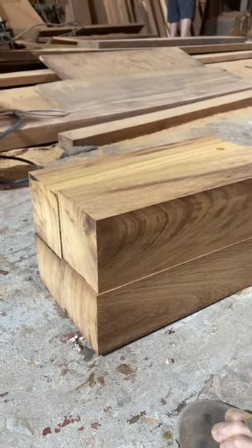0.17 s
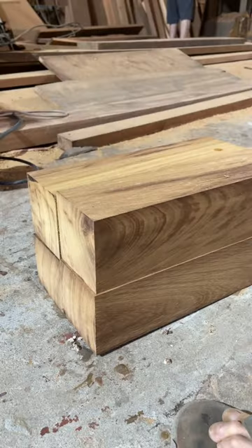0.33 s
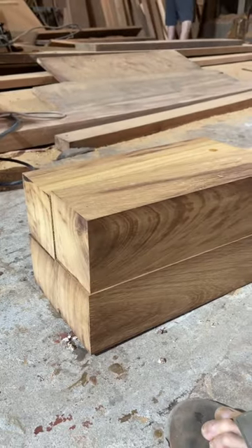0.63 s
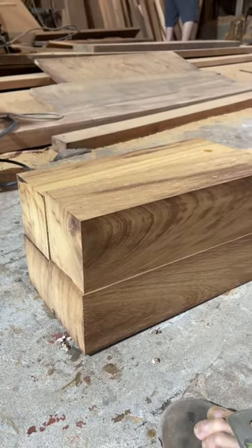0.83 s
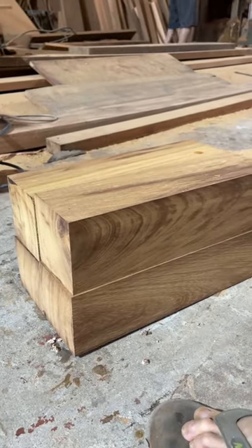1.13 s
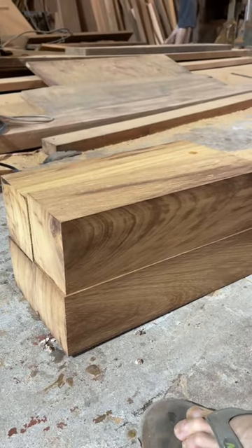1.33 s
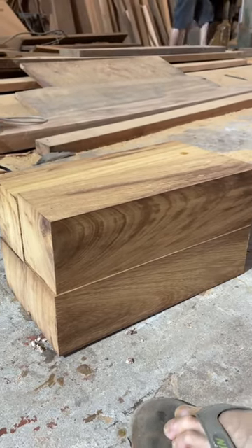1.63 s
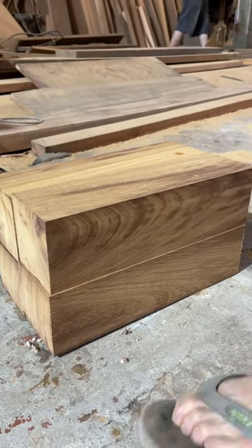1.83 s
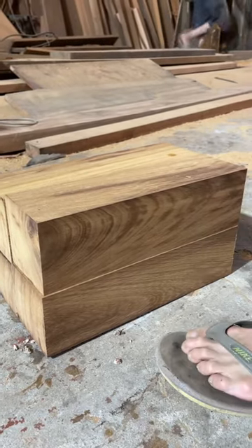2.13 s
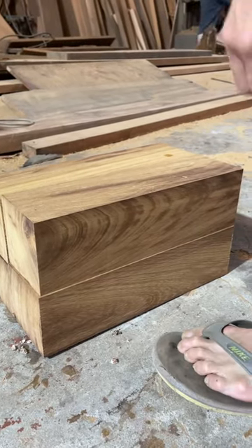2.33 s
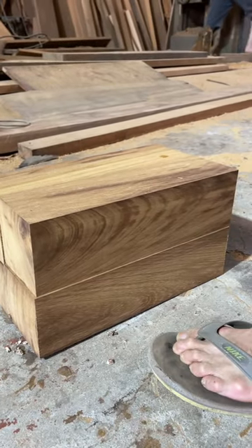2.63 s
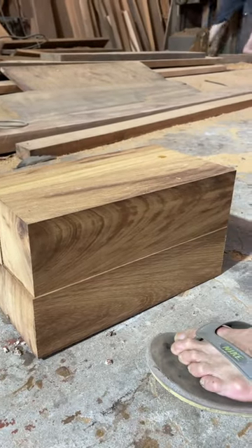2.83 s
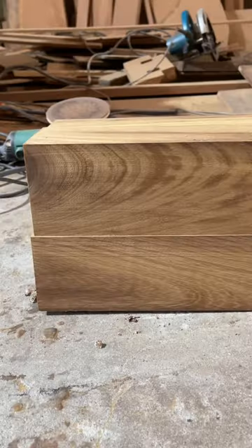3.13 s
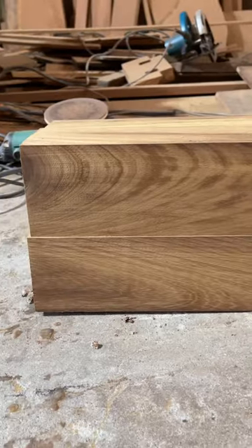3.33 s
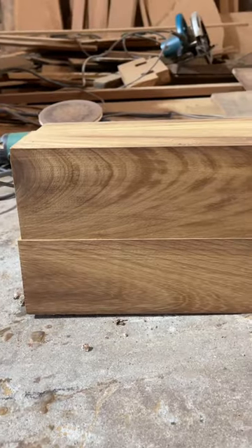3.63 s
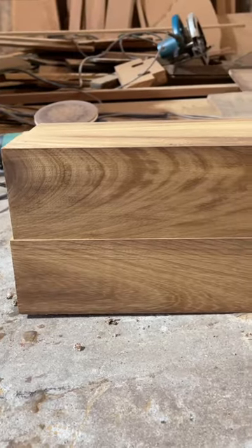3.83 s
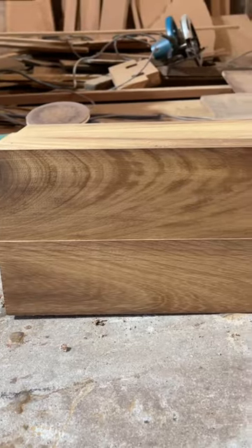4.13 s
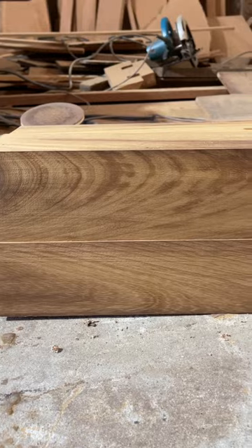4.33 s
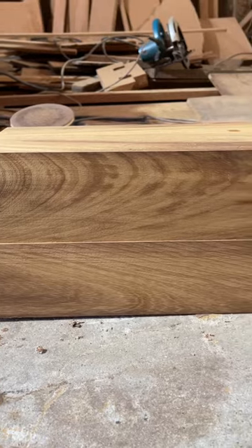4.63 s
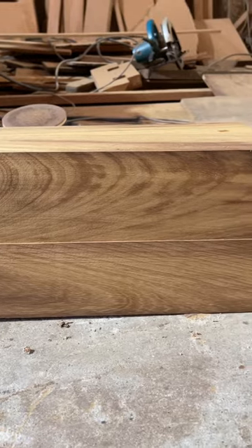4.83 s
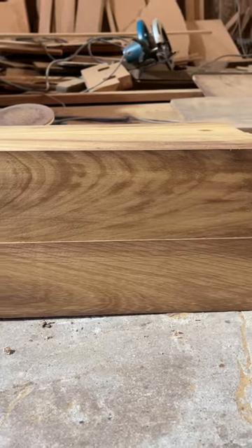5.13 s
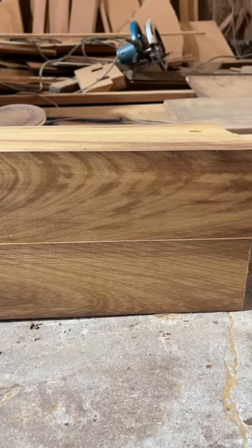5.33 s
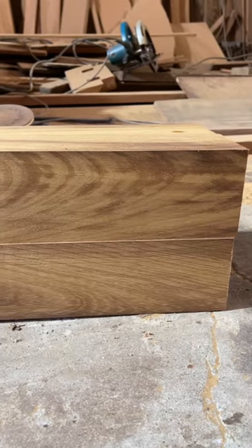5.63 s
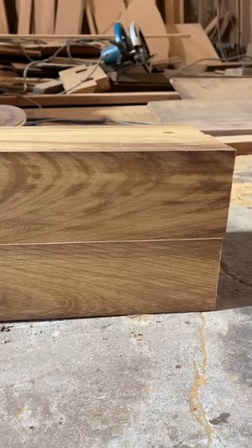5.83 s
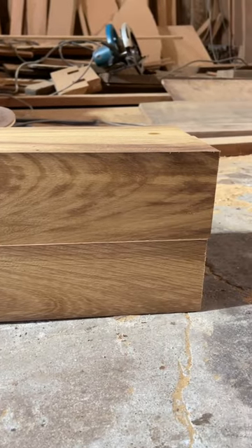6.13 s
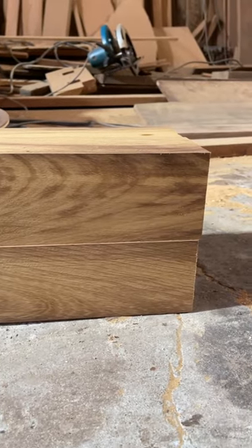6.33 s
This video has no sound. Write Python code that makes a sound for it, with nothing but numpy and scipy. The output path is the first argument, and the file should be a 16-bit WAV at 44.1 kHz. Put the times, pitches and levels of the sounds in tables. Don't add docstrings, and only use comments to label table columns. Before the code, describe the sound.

From 0 to 2.8 s a planer a few metres off cuts a board in an open workshop: a rough, pitched roar with a fast knife buzz, hissing torn chips and board resonances that shift in pitch. It begins strong, eases from about 0.3 to 1 s, swells again just after 1 s, then gradually weakens. Wind thumps the microphone at the start and again around 2.4-2.7 s; small metal knocks fall at 2.4, 2.55 and 2.8 s. A near-silent gap of about 0.05 s marks the scene change. From 2.9 s the machine idles with a wavering low hum near 240 Hz, thin motor and belt whines and airy roar. At 3.3 s a hard metal clank bounces twice and echoes. Gusts continue buffeting, especially 3.6-4.6 s. At about 5.7 s the next board bites with a sudden loud crack, then a bright, harsh roar fluctuates to the abrupt end at 6.5 s.

```python
import sys
import numpy as np
from scipy import signal
from scipy.fft import rfft, irfft, next_fast_len
from scipy.io import wavfile
from scipy.ndimage import uniform_filter1d

SR = 44100
rng = np.random.default_rng(int(sys.argv[2]) if len(sys.argv) > 2 else 0)


def master_out(mix):
    frames = np.transpose(np.atleast_2d(mix))
    ceiling = np.clip(frames, -1, 1)
    pcm = np.round(ceiling * 32767).astype(np.int16)
    wavfile.write(sys.argv[1], SR, pcm)


def ratio_of_db(decibels):
    return 10 ** (np.asarray(decibels, float) / 20)


N = 286076

# time in seconds, cut level in dB, brightness in dB,
# chip hiss against the knife bites in dB.
BOARD_PASSES = [
    [(0.0, -30.5, -7.5, 0.5), (0.26, -37, -7, 6.5), (0.6, -38.5, 3, -5.5), (0.97, -38, -4.5, 4),
     (1.07, -28.5, -4.5, -4.5), (1.66, -33, -4, -1), (1.73, -31.5, -10.5, 7), (2.03, -31.5, -4.5, -6),
     (2.83, -37.5, 0.5, 0.5)],
    [(5.69, -57, 23, -11), (5.742, -16, 0, -24), (5.776, -24.5, 1, -5.5), (5.85, -28.5, 4.5, -7),
     (5.98, -28, 1.5, -7), (6.172, -22.5, -6, -4.5), (6.312, -26.5, -3.5, -1), (6.487, -27, -1.5, -7.5)],
]
KNIFE_LEVELS = [0, -14, -19]
# start in seconds, end in seconds.
SCENE_CHANGE = (2.836, 2.8815)
# time in seconds, buffet level in dB, buffet pitch in Hz, spread of the gust in seconds.
WIND_GUSTS = [(0.014, -15.5, 176, 0.053), (0.079, -11.5, 190, 0.01), (0.179, -16, 232, 0.044),
              (0.343, -20.5, 105, .04), (0.419, -20.5, 143, 0.053), (0.792, -24.5, 132, 0.15),
              (2.42, -20.5, 216, 0.032), (2.515, -15.5, 236, 0.038), (2.652, -13.5, 148, 0.035),
              (2.738, -16, 237, 0.013), (2.945, -22, 340, 0.05), (3.002, -19, 128, 0.15),
              (3.264, -23, 325, 0.034), (3.304, -15.5, 352, 0.016), (3.624, -14.5, 173, 0.027),
              (3.95, -18.5, 151, 0.082), (4.038, -18.5, 230, 0.071), (4.128, -17.5, 175, 0.012),
              (4.383, -13.5, 150, 0.067), (4.435, -13, 223, 0.032), (4.51, -16.5, 177, 0.034),
              (4.595, -22, 308, 0.046), (4.948, -19.5, 310, 0.023), (5.015, -17, 149, 0.016),
              (5.429, -18, 200, 0.053), (5.653, -13.5, 155, 0.036), (5.727, -15.5, 188, 0.015),
              (5.92, -19, 117, 0.072), (6.253, -16.5, 304, 0.048), (6.456, -20, 311, 0.099)]


def evened(x):
    return x / np.sqrt(np.mean(abs(x) ** 2) + 1e-20)


def read(points, hz):
    f, value = np.transpose(points)
    return np.interp(np.log(hz + 1), np.log(f + 1), value)


def column(tables, t, order):
    rows = np.concatenate(tables)
    return np.interp(t, rows[:, 0], rows[:, order])


def add(mix, s, sound):
    part = mix[..., max(round(s * SR), 0):][..., :sound.shape[-1]]
    part += sound[..., :part.shape[-1]]


def coloured(x, points):
    size = next_fast_len(N)
    gain = ratio_of_db(read(points, np.fft.rfftfreq(size, 1 / SR)))
    return evened(irfft(rfft(x, size) * gain, size)[..., :N])


def slow(hz):
    frames = N // 64 + 2
    fall = 1 / (1 + (np.fft.rfftfreq(frames, 64 / SR) / hz) ** 4)
    curves = evened(irfft(rfft(rng.standard_normal((2, frames))) * fall, frames))
    return np.array([np.interp(np.arange(N) / 64, np.arange(frames), c) for c in curves])


def resonate(x, hz, width):
    r = np.exp(-np.pi * width / SR)
    return signal.lfilter([1 - r], [1, -2 * r * np.cos(2 * np.pi * hz / SR), r * r], x)


def spectrum(x):
    return signal.stft(x, SR, nperseg=2048, noverlap=1536)


def waveform(z):
    return signal.istft(z, nperseg=2048, noverlap=1536)[1][..., :N]


def turns():
    # time in seconds, shaft speed in Hz.
    shaft_speed = [(0, 79.6), (2.8, 79.63), (2.9, 79.7), (5.7, 79.7), (5.85, 79.62), (6.1, 79.51),
                   (6.49, 79.4)]
    s, hz = np.transpose(shaft_speed)
    return np.cumsum(np.interp(np.arange(N) / SR, s, hz)) / SR


def knife_bites(wobble=.07):
    passes = len(KNIFE_LEVELS) * turns()
    hit = np.flatnonzero(np.diff(passes // 1) > 0)
    knife = (passes[hit + 1] % len(KNIFE_LEVELS)).astype(int)
    bites = np.zeros(N)
    bites[hit] = ratio_of_db(KNIFE_LEVELS)[knife] * (1 + wobble * rng.standard_normal(len(hit)))
    return bites


def board_resonances(hz, when, width=40, ring_db=-2, skirt=0.5, skirt_width=300):
    # start in seconds, end in seconds, pitch in Hz, gain in dB.
    board_modes = [(0.0, 0.338, 7440, 17), (0.076, 0.56, 2890, 6.5), (0.97, 1.248, 2390, 8),
                   (0.99, 1.658, 2452, 14), (6.198, 6.5, 4370, 4), (0.72, 1.7, 4220, 6),
                   (1.05, 1.922, 1433, 9.5), (1.36, 1.74, 2950, 9), (1.587, 2.62, 1743, 7),
                   (1.89, 2.476, 1474, 9.5), (1.8, 2.5, 2654, 12), (2.124, 2.56, 2810, 9),
                   (2.0, 2.712, 2483, 10), (2.563, 2.8, 7430, 15), (5.696, 6.16, 3627, 13),
                   (5.72, 5.9, 3035, 26.5), (5.723, 5.86, 1650, 15), (5.95, 6.32, 2832, 13),
                   (5.954, 6.5, 987, 11), (6.002, 6.322, 5803, 8), (6.015, 6.3, 1880, -2),
                   (6.137, 6.483, 6530, 19.5), (6.26, 6.513, 3050, 16), (6.309, 6.5, 2400, 5.5),
                   (6.33, 6.502, 3826, 21), (5.8, 6.106, 1370, 11.5), (0.0, 0.395, 2556, 8.5),
                   (2.62, 2.78, 1390, 24.5), (2.674, 2.9, 2250, 15), (2.508, 2.818, 3770, 2)]
    rings = skirts = 0
    for (start, end, mode_hz, db), lag in zip(board_modes, rng.random(len(board_modes))):
        on = np.clip(np.minimum((when - start) / .05, (end - when) / .3 + .4), 0, 1)
        peak = ratio_of_db(db + ring_db - skirt * db) / (1 + 1j * (hz - mode_hz) / width) ** 2
        rings = rings + np.outer(peak, on * np.exp(2j * np.pi * lag))
        skirts = skirts + np.outer(skirt * db / (1 + ((hz - mode_hz) / skirt_width) ** 2) ** 2, on)
    return rings, skirts


def cutting(direct=0.26, treble_direct=0.27, gate=0.35, patchy_db=4.0):
    # frequency in Hz, level in dB.
    bite_colour = [(300, -11), (600, 0.5), (1000, -1.5), (1500, 0.5), (2300, 6), (3000, 3), (4000, 3.5),
                   (5000, 7), (6500, -1.5), (8000, 2), (9500, -5), (11000, -14), (12500, -11), (14000, -55)]
    # frequency in Hz, level in dB.
    chip_colour = [(300, 8), (600, -28), (1000, -27), (1500, 0), (2300, 5), (3000, 2.5), (4000, 6.5),
                   (5000, 7.5), (6500, 7), (8000, 4), (9500, 16), (11000, 8.5), (12500, -21), (14000, -53)]
    t, bites = np.arange(N) / SR, knife_bites()
    hz, when, z = spectrum(bites)
    a, b = rng.standard_normal((2, len(when), 2, len(hz))).transpose(0, 2, 3, 1)

    scatter = uniform_filter1d(uniform_filter1d(a + 1j * b, size=24, axis=2), size=24, axis=2)
    straight = direct + (treble_direct / (1 + (5000 / (hz + 1)) ** 6))[:, None]
    paths = straight + evened(scatter)
    rings, skirts = board_resonances(hz, when)
    octaves = np.clip(np.log2(hz / 3000 + 1e-9), 0, 1)
    bright = np.outer(octaves, column(BOARD_PASSES, when, order=2) + 4) + skirts
    tone = waveform(z * (paths + rings) * ratio_of_db(read(bite_colour, hz)[:, None] + bright))

    beat = 1 - gate + gate * evened(signal.lfilter([1], [1, -.99], bites))
    hiss = coloured(rng.standard_normal((2, N)) * beat, chip_colour)
    patches = evened(uniform_filter1d(uniform_filter1d(a[0], size=20, axis=0), size=6, axis=1))
    hiss = waveform(spectrum(hiss)[2] * ratio_of_db(bright + patchy_db * patches))

    tone /= np.sqrt(uniform_filter1d((tone ** 2).mean(0), size=6000))
    feeding = (t < SCENE_CHANGE[0]) | (t > BOARD_PASSES[1][0][0])
    level = ratio_of_db(column(BOARD_PASSES, t, order=1) + 3.0)
    return feeding * level * (tone + ratio_of_db(column(BOARD_PASSES, t, order=3)) * hiss)


def knife_hum(waver_db=1.37, upper_waver_db=3.5):
    # time in seconds, hum level in dB.
    hum_levels = [(0.07, -37.5), (0.48, -36.5), (0.7, -29), (2.0, -28), (2.66, -27), (2.86, -33),
                  (3.01, -27.5), (3.22, -36), (3.33, -29), (4.07, -23), (4.43, -27), (4.51, -32.5),
                  (4.7, -25), (5.67, -24), (5.81, -31.5), (5.96, -25), (6.4, -27.5), (6.49, -40)]
    # multiple of the knife rate, level in dB.
    hum_orders = [(1, 0), (2, -16), (3, -19), (4, -23), (5, -37), (6, -58), (7, -32), (8, -28.5)]
    angle = 2 * np.pi * len(KNIFE_LEVELS) * turns()
    level_db = column([hum_levels], np.arange(N) / SR, order=1)
    gusty = np.clip(20 * np.log10(gusting()[0]) / 6 + 7, .5, 3)
    gain = np.sqrt(2) * ratio_of_db(level_db - 3.5 + waver_db * gusty * slow(38)[0])
    hum = gain * np.sin(angle + 0.13 * slow(12)[0])
    for k, db in hum_orders[1:]:
        hum = hum + ratio_of_db(db - 28 + upper_waver_db * slow(18.0)) * np.sin(k * angle + 0.41 * slow(9.6))
    return hum


def motor_and_air(belt_hz=1001, steady_hz=2887, steady_db=-54, roar_db=-38):
    # frequency in Hz, level in dB.
    roar_colour = [(60, -18), (300, -6), (600, -17), (800, -4), (1050, -13), (1300, -14), (2000, -18),
                   (3500, -21.5), (5000, -24.5), (7000, -26.5), (8500, -19.5), (10000, -20), (11500, -34),
                   (12200, -72)]
    # pitch in Hz, bandwidth in Hz, level in dB.
    fuzzy_whines = [(778, 1.6, -49.5), (895, 2.6, -51), (712, 16, -51.5), (730, 5, -49), (1225, 18, -54),
                    (2954, 10, -55)]
    # time in seconds, level in dB.
    belt_levels = [(0, -97), (2.9, -46), (3.9, -49.5), (4.2, -42), (5.3, -43.5), (5.6, -42)]
    t, air = np.arange(N) / SR, rng.standard_normal((2, N))
    whines = sum(ratio_of_db(db) * evened(resonate(air, hz, width)) for hz, width, db in fuzzy_whines)
    belt_gain = ratio_of_db(column([belt_levels], t, order=1) + 1.0 * slow(3.3)[0])
    whines += belt_gain * np.sin(2 * np.pi * belt_hz * t + .5 * slow(4.3))
    whines += ratio_of_db(steady_db + 1.5 * slow(8)) * np.sin(2 * np.pi * steady_hz * t + 1.3 * slow(9))
    return whines + ratio_of_db(roar_db + 0.46 * slow(3.5)[0]) * coloured(air, roar_colour)


def gusting(rumble_db=-14.5, reach_db=-0.5, reach_db_per_octave=12, calm_reach_db=-13.5):
    # time in seconds, rumble level in dB.
    breeze_levels = [(0.3, -40), (1.1, -43), (2.3, -37), (3.4, -34.5), (3.75, -41.5), (4.3, -37),
                     (5.3, -36), (5.85, -36.5), (6.49, -41)]
    t = np.arange(0, N + 64, 64) / SR
    low = ratio_of_db(column([breeze_levels], t, order=1)) ** 2
    mids = low * ratio_of_db(calm_reach_db) ** 2
    for s, db, hz, spread in WIND_GUSTS:
        swell = ratio_of_db(db + rumble_db) ** 2 * np.exp(-((t - s) / max(spread, .01)) ** 2)
        low = low + swell
        mids = mids + swell * ratio_of_db(reach_db + reach_db_per_octave * np.log2(hz / 200)) ** 2
    return [np.interp(np.arange(N) / SR, t, np.sqrt(power)) for power in (low, mids)]


def wind(lumpy_db=2.5, cycles=2.2):
    # frequency in Hz, level in dB.
    rumble_colour = [(20, -60), (34, -22), (55, 0), (110, 0), (200, -8), (350, -13), (600, -24),
                     (1000, -48), (3000, -80)]
    low, mids = coloured(rng.standard_normal((2, 2, N)), rumble_colour)
    band = signal.butter(2, [220, 620], "bandpass", fs=SR, output="sos")
    mids = evened(signal.sosfilt(band, mids))
    low_gain, mid_gain = gusting()
    out = ratio_of_db(lumpy_db * slow(33)[0]) * (low_gain * low + mid_gain * mids)
    for (s, db, hz, _), (phase, bend) in zip(WIND_GUSTS, rng.random((len(WIND_GUSTS), 2))):
        u = np.arange(-cycles, cycles, hz / SR)
        swing = np.cos(2 * np.pi * (phase + u + 1.35 * (bend - .5) * u ** 2))
        puff = np.exp(-4 * (u / cycles) ** 2) * swing
        add(out, s - cycles / hz, ratio_of_db(db - 3.5) * puff)
    return out


def clanks(rattle=1.1, room_db=-4, room_t60=0.56):
    # time in seconds, peak level in dB, own ring in Hz, its 60 dB decay in seconds.
    strikes = [
        (2.404, -18, 1300, 0.1),
        (2.411, -19, 1513, 0.086),
        (2.549, -23, 1100, .05),
        (2.806, -21, 886, 0.085),
        (3.3122, -8, 1357, 0.16),
        (3.3364, -14, 2785, 0.11),
        (3.3562, -16, 1870, 0.049),
    ]
    # frequency in Hz, level in dB, 60 dB decay in seconds.
    metal_modes = [(958, -14, .06), (1798, -12, .05), (2400, -13, .04), (2799, -14, .04), (3370, -15, .05),
                   (3990, -13, .2), (6100, -10, .02)]
    t, dry = np.arange(9000) / SR, np.zeros(N)
    for s, db, hz, own_t60 in strikes:
        modes = list(metal_modes) + [(hz, 0, own_t60)]
        ring = sum(ratio_of_db(d - 60 * t / t60) * np.sin(2 * np.pi * f * t) for f, d, t60 in modes)
        crack = evened(resonate(rng.standard_normal(len(t)), 2100, 2500)) * ratio_of_db(-60 * t / .09)
        add(dry, s, ratio_of_db(db - 10.5) * (ring + 0.9 * rattle * crack) * np.minimum(t / 0.0011, 1))
    u = np.arange(SR // 2) / SR
    tail = rng.standard_normal((2, len(u))) * ratio_of_db(-60 * u / room_t60) * (u > .008)
    echo = signal.fftconvolve(dry[None], tail / np.linalg.norm(tail[0]), axes=1)[:, :N]
    return dry + ratio_of_db(room_db) * echo


def treble_gated(ports, under_db=12, faint_db=24, from_hz=4400, fickle_db=3):
    hz, _, z = spectrum(np.array([ports[0] + ports[1], ports[0] - ports[1]]) / 2)
    bands = abs(z[:, :-1]).reshape(2, 128, 8, -1) ** 2
    power = uniform_filter1d(bands.mean(2), size=3, axis=2)
    treble = (hz[:-1:8] > from_hz)[:, None]
    drift = fickle_db * evened(uniform_filter1d(rng.standard_normal(power.shape[2]), size=10))
    weak = power < power[::-1] * ratio_of_db(-2 * under_db - drift)
    faint = power < (power * treble).max((0, 1)) * ratio_of_db(-2 * (faint_db + drift))
    z[:, :-1] *= np.repeat(~(treble & (weak | faint)), 8, axis=1)
    mid, side = waveform(z)
    return np.array([mid + side, mid - side])


def scene():
    return cutting() + knife_hum() + motor_and_air() + wind() + clanks()


def roll_off(x):
    return signal.sosfilt(signal.butter(12, 12870, fs=SR, output="sos"), x)


def record(dry):
    # frequency in Hz, lead of the left port in half turns.
    port_phase = [(0, 0), (1030, -.16), (2410, .13), (4100, .25), (4900, 1), (5680, 1.93), (6350, 2.06),
                  (8400, 2.86), (9500, 3.06), (10900, 3.5), (11800, 4)]
    # frequency in Hz, unshared part in dB.
    port_apart = [(60, -20), (250, -14), (500, -8), (1000, -6), (2000, -6), (4000, -5), (4900, -11),
                  (6000, -18), (7200, -7), (9000, -18)]
    size = next_fast_len(N)
    hz = np.fft.rfftfreq(size, 1 / SR)
    a, b = rfft(dry, size) / np.sqrt(2)
    apart = ratio_of_db(read(port_apart, hz)) * (a - b)
    turn = np.exp(.5j * np.pi * read(port_phase, hz))
    ports = treble_gated(irfft(np.array([(a + b + apart) * turn, (a + b - apart) / turn]), size)[:, :N])
    t = np.arange(N) / SR
    start, end = SCENE_CHANGE
    fading = .012 * np.clip(1 - (t - start) / 0.022, 0, 1)
    ports *= np.where(t < start, 1, np.where(t < end, fading, 1))
    return roll_off(ports)


dry = scene()
out = record(dry)
master_out(out)
```